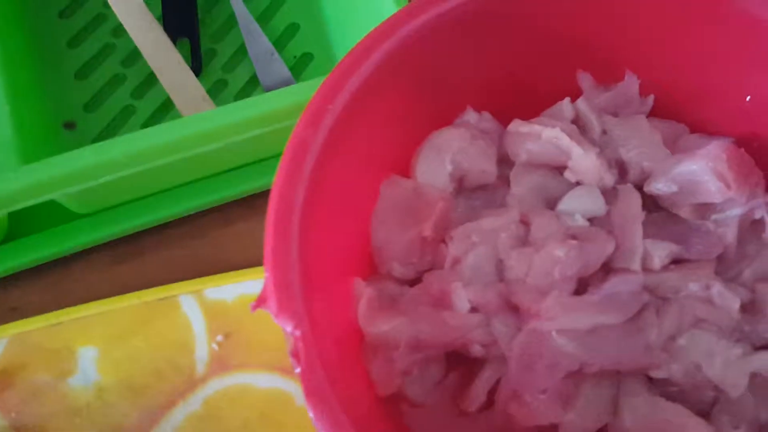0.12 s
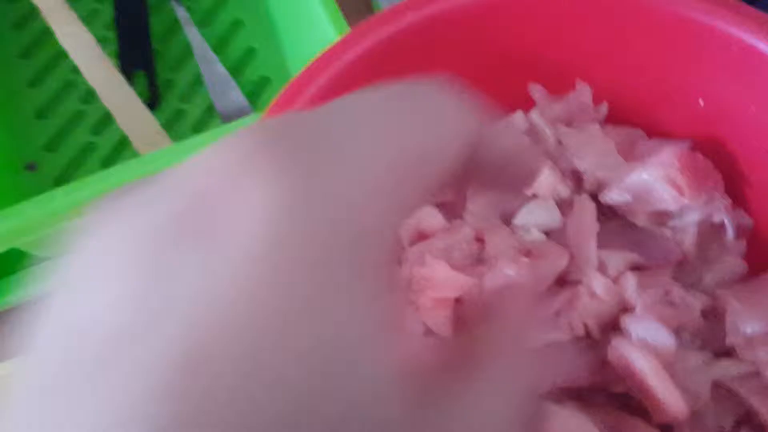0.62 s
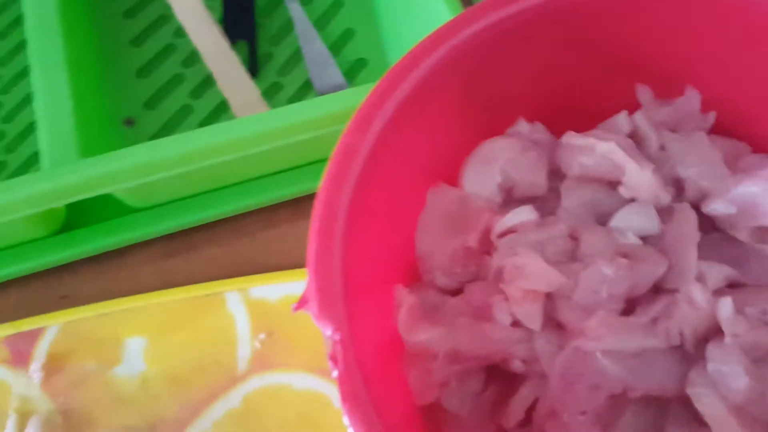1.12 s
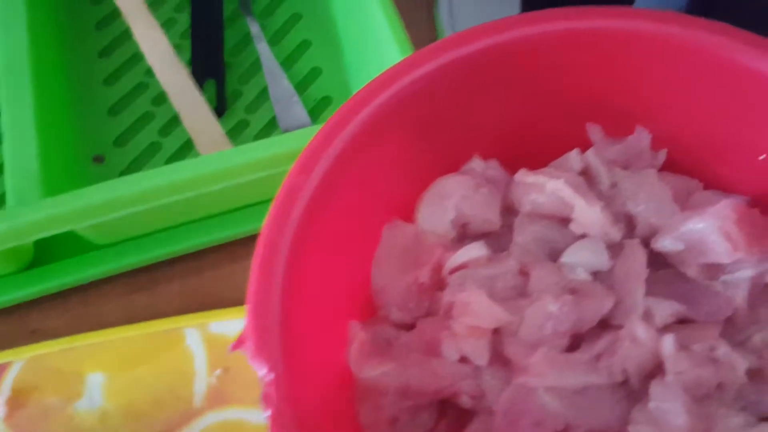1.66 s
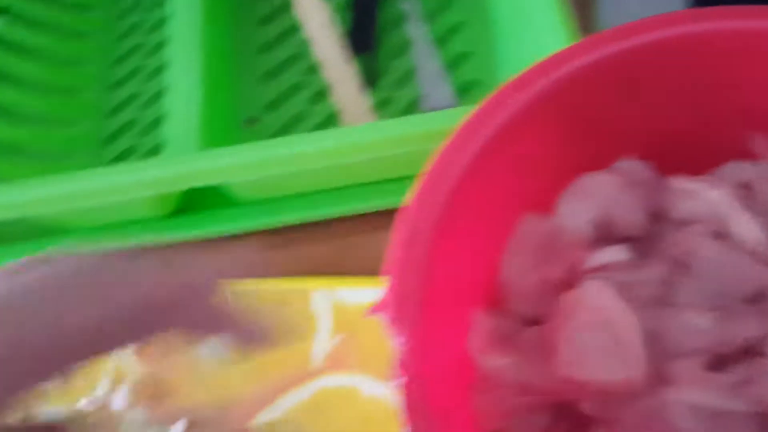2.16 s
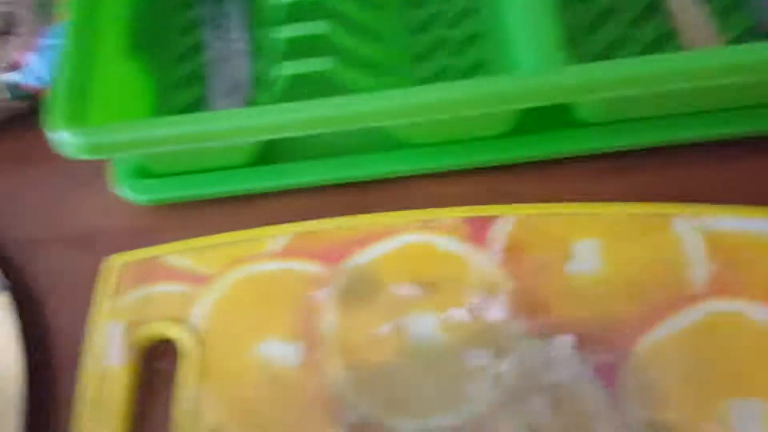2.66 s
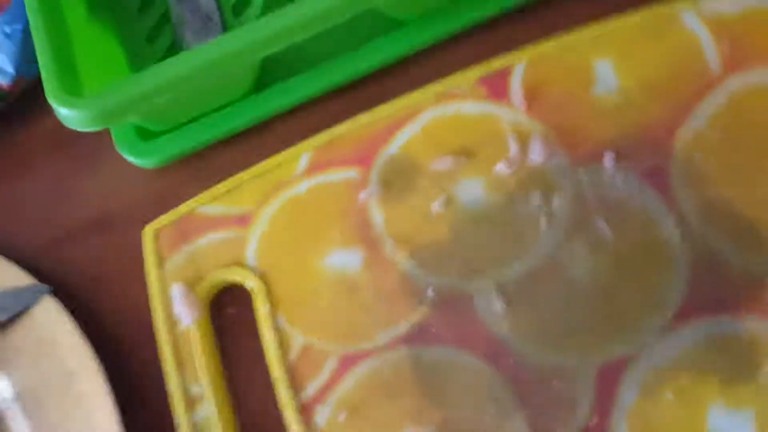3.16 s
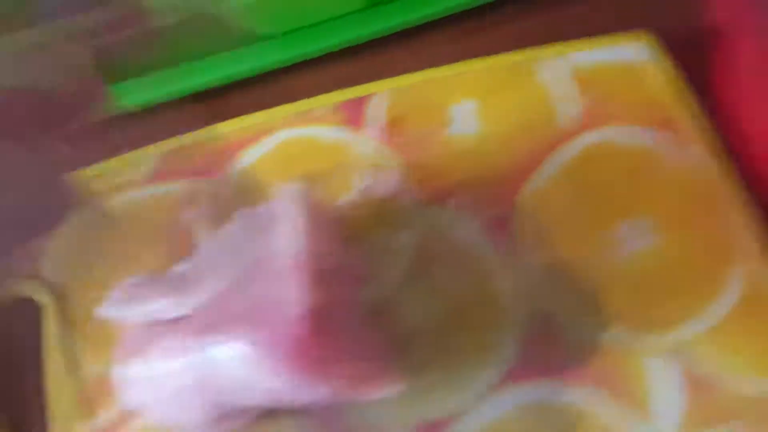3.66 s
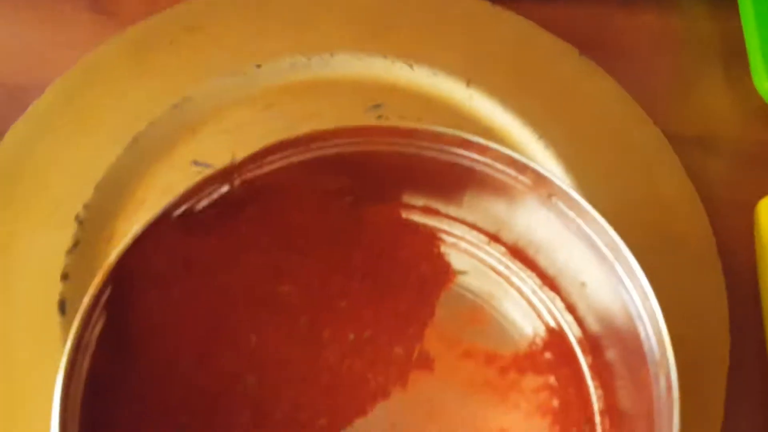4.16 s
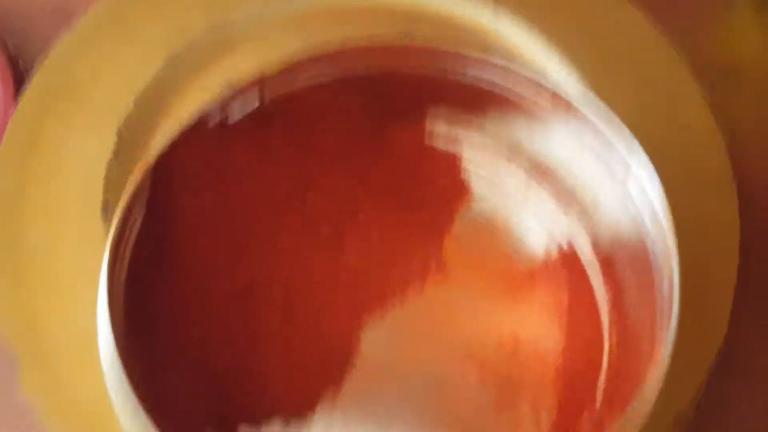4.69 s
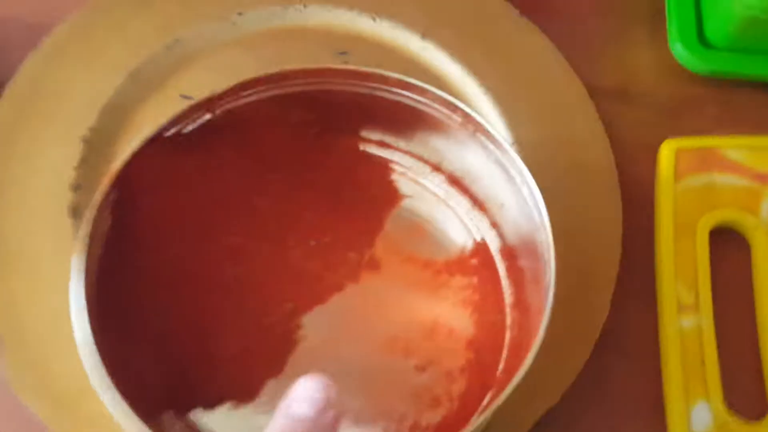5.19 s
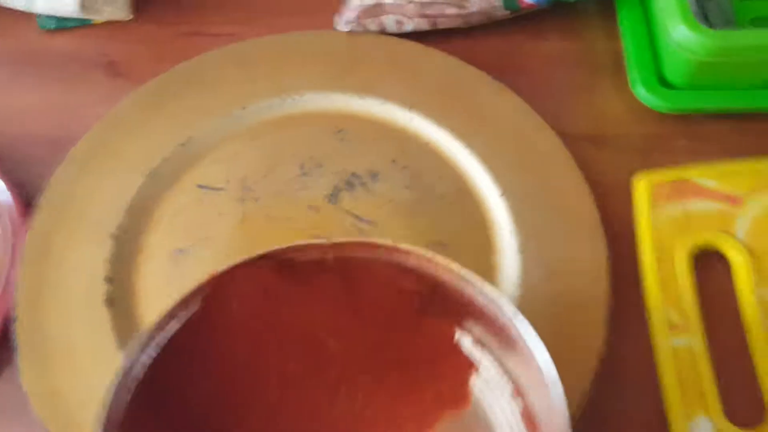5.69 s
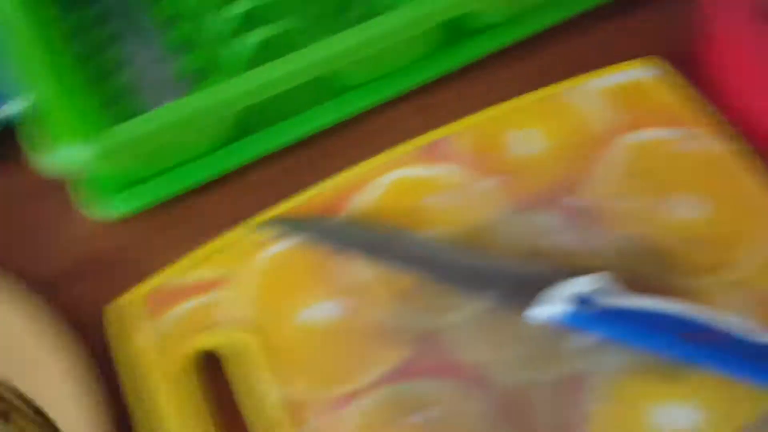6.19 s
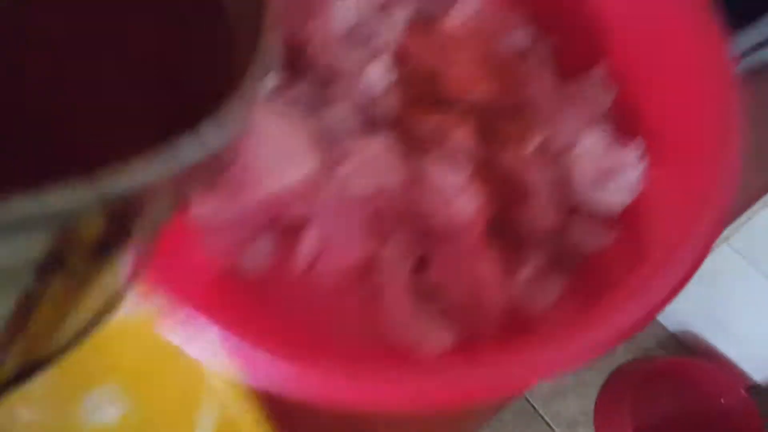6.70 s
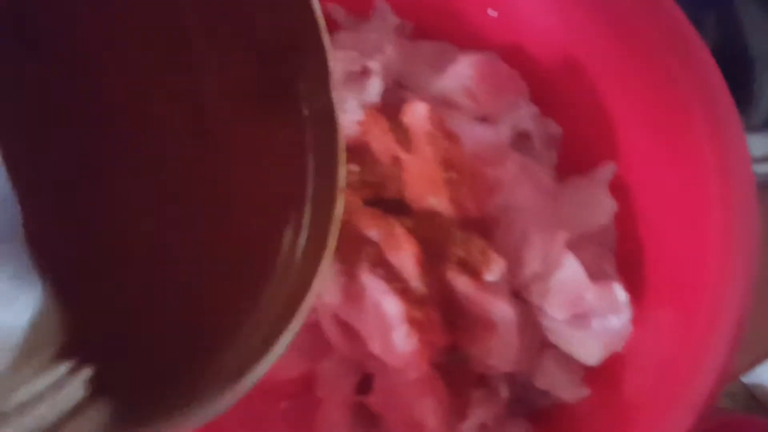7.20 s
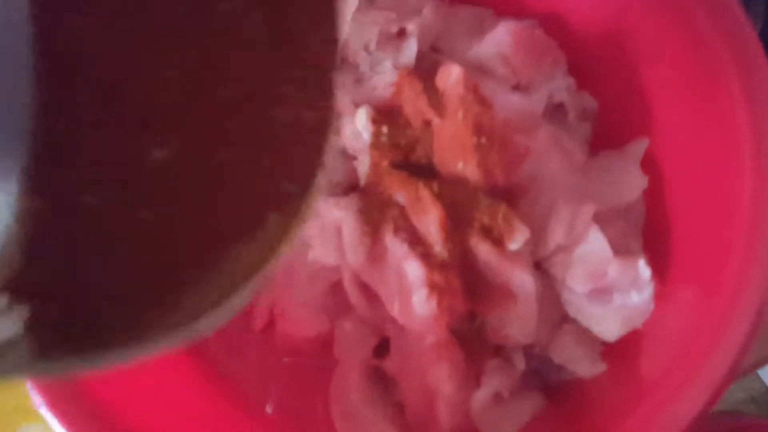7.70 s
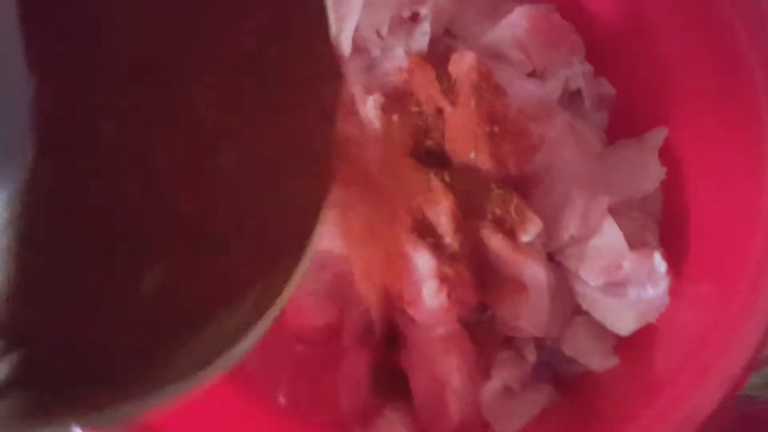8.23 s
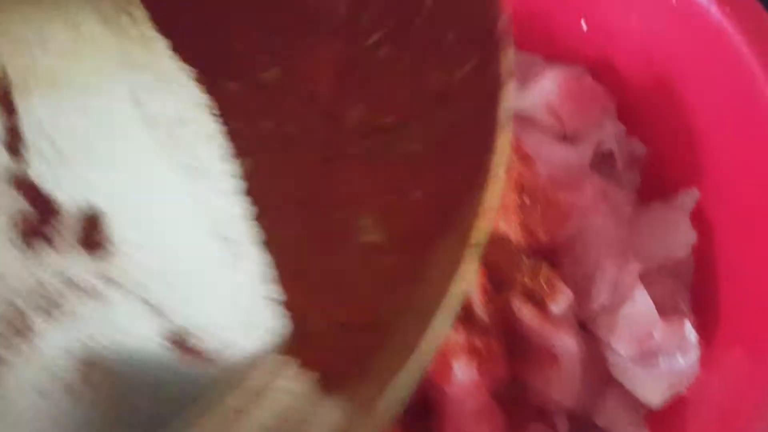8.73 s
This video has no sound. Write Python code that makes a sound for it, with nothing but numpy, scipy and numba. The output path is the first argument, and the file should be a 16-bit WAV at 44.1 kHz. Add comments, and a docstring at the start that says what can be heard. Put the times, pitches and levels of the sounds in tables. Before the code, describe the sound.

A handheld, close stereo microphone in a reverberant kitchen picks up faint appliance hum and quiet knocks, clicks and rubbing on a counter. Near five seconds a large dog gives one loud, gruff bark with strong reflections. Sharper dish clatter follows, then two more quick barks, and finally faint dry puffs of powder shaken from a tin. The sound dips after barks and eases back.

```python
"""A hard-walled kitchen from a handheld camera with two close microphones, faint appliance hum all through.
First a hand close by knocks, clicks and rubs dishes on the counter: short pushes ring modes, noise is shaped.
Near 4.9 s a large dog some way off barks: rough pulses through a moving throat, with strong room reflections.
Dishes and sliding powder follow, two more barks just after 7 s, then puffs of powder shaken from a tin.
Gain control ducks the whole sound after each bark and lets it ease back."""
import sys
import numpy as np
from scipy import signal
from scipy.io import wavfile
from scipy.ndimage import uniform_filter1d
from numba import njit

SR = 44100
rng = np.random.default_rng(int(sys.argv[2]) if len(sys.argv) > 2 else 0)


def bounce(signal):
    """Save signal as a 16-bit WAV file at the path given by the first command-line argument."""
    frames = np.transpose(np.atleast_2d(signal))
    limited = np.clip(frames, -1, 1)
    pcm = np.round(limited * 32767).astype(np.int16)
    wavfile.write(sys.argv[1], SR, pcm)


def decibels_to_gain(level_db):
    """Convert a level in decibels to a linear amplitude gain (20 dB per decade)."""
    exponent = np.asarray(level_db, float) / 20
    return 10 ** exponent


N = 390285

# the dog's barks: (burst time [s], effort [dB], pitch before the sag [Hz], pitch where the growl starts [Hz],
# widest mouth [factor on the throat])
BARKS = [(4.853, -12, 174.6, 170.1, 1.04), (7.108, -12, 170.8, 70.23, 1.09),
         (7.445, -12.5, 163.8, 111.8, 1.15)]
# resonances of throat and mouth at factor 1: (centre [Hz], width [Hz], level [dB])
THROAT = [(405.5, 130.5, 4), (680, 180, -9.5), (1000, 295, -2), (1557, 730, -13.5), (2310, 740, -23.5)]
# hiss of air past tongue and teeth: (centre [Hz], width [Hz], level with the mouth open [dB])
RASP = [(5650, 3700, -34), (8870, 7200, -42.5)]
# blows on counter and dishes: (time [s], ring peak [dB], favoured ring [Hz], boom before its soft start [dB],
# drag [s])
KNOCKS = [(0.136, -51, 664, -38, 0.0075), (1.106, -45, 338, -52, 0.03), (1.24, -32, 710, -34, 0.0087),
          (1.327, -38, 361, -35, 0.0043), (1.401, -41, 352, -38, 0.0029), (1.517, -48, 234, -31.5, 0.0039),
          (2.079, -44.5, 296, -70, 0.0062), (2.783, -35.5, 230, -29.5, 0.0058),
          (2.978, -28.5, 690, -35, 0.0013), (3.549, -25, 1010, -31, 0.0013),
          (4.081, -35, 360, -30, 0.00067), (5.384, -15, 940, -50, 0.0067), (5.463, -36.5, 948, -55, 0.0034),
          (5.557, -31.5, 955, -66, 0.03), (5.633, -16.5, 300, -44, .007), (5.669, -22.5, 350, -54, 0.0032),
          (5.713, -31, 350, -39, 0.021), (5.757, -29.5, 342, -49, .008), (6.317, -36, 680, -45.5, 0.0026),
          (6.526, -39.5, 338, -66, 0.008)]
# ringing modes of the counter: (frequency [Hz], level before favouring [dB], t60 [s])
COUNTER_MODES = [(199.5, -11.5, 0.33), (271, -14, 0.043), (350, -5.5, 0.056), (435, -4.5, 0.0295),
                 (670, -25.5, 0.062), (736, -4.5, 0.033), (894, -12.5, 0.02), (1035, 2, 0.009),
                 (1265, -12.5, 0.033)]
# small sharp clicks: (time [s], crackle onset [dB], crackle centre [Hz], snap onset [dB])
CLICKS = [(0.139, -44.5, 4100, -53), (0.687, -41, 4600, -44), (1.4044, -37.5, 9300, -43.5),
          (2.9154, -33, 9770, -39.5), (2.9932, -35.5, 8700, -60), (3.5424, -30, 3730, -81),
          (4.0842, -35.5, 8500, -37.5), (5.3865, -47, 3840, -11), (5.4637, -51, 2970, -19.5),
          (5.7765, -30, 3030, -19), (5.7885, -42.5, 3086, -29.5), (5.8077, -28.5, 7200, -31.5),
          (5.8333, -27.5, 7880, -65.5)]
# hand and dishes sliding: (peak time [s], rise [s], fall [s], peak level [dB], centre [Hz])
STROKES = [(2.275, 0.19, 0.46, -56, 2960), (2.781, 0.087, 0.12, -61, 4640), (3.23, 0.22, 0.14, -43, 3330),
           (3.536, 0.026, 0.03, -57.5, 3600), (4.75, 0.038, .03, -43, 3070),
           (5.758, 0.24, 0.027, -38, 1160), (2.1, 0.22, 0.14, -56, 474), (4.3, .2, 0.18, -54, 350),
           (1.3, 0.15, 0.37, -56.5, 446), (5.841, 0.18, 0.055, -48.5, 6000), (6.528, 0.05, 0.11, -55, 3510),
           (6.849, 0.11, 0.32, -53.5, 3480)]
# dry powder sliding as the tin is lifted, then shaken from it: (time [s], level before the fades [dB], length [s])
POWDER_PUFFS = [(5.34, -53, .1), (5.53, -58, .1), (5.67, -59.5, .12), (5.8, -50, .12), (7.89, -60.5, .06),
                (7.985, -44.5, .055), (8.065, -46, .06), (8.17, -67.5, .05), (8.24, -56, .06),
                (8.325, -54.5, .055), (8.4, -55.5, .06)]
# bumps of the handheld camera: (time [s], level before the soft start [dB], frequency [Hz])
JOLTS = [(3.55, -25.5, 43), (4.08, -31.5, 81), (4.6, -20, 48)]
# low shaking of the handheld camera: (time [s], level before the channel weights [dB])
RUMBLE = [(0, -56), (4.2, -77), (4.499, -61.5), (8.85, -80)]
# strongest standing waves of the room: (frequency [Hz], width [Hz], boost [dB])
STANDING_WAVES = [(347, 12, 8), (420, 12, 4), (482, 12, 7), (566, 12, 1), (660, 18, 5), (732, 14, 1),
                  (843, 12, 2), (897, 12, 5), (953, 12, 1), (1040, 10, 7), (1193, 12, 3), (1260, 12, -1),
                  (1548, 24, 1), (1775, 24, -1)]
# decay of the reflections: (frequency [Hz], t60 [s])
WALL_DECAY = [(200, 0.22), (500, 0.64), (1000, 0.52), (2500, 0.59), (8000, 0.34)]
# likeness of the left and right microphones: (frequency [Hz], correlation [-1 to 1])
LIKENESS = [(60, 1), (180, 0.85), (550, 0.63), (1650, -0.23), (4970, 0.11), (15000, -0.16)]
# relative spectrum of the broad room noise: (frequency [Hz], density [dB per Hz])
HUM_SPECTRUM = [(35, -42.5), (60, -24), (268, -5), (389, -10.5), (698, -9.5), (1580, -9.5), (2050, -7),
                (3340, -21), (4220, -22), (5330, -25.5), (12100, -24.5), (16000, -31.5)]
# fuzzy bands of the appliance: (centre [Hz], width [Hz], nominal level [dB])
DRONE = [(110, 41, -60.5), (265, 10, -70), (1980, 310, -58), (4410, 580, -73)]

GROWL_S, LEAP_S, BARK_S, RELEASE_S = .05, 0.033, .19, 0.032  # the leap from growl to voice centres on the burst
GROWL_DB, SWELL_DB_PER_S, FADE_DB_PER_S = -23, 497.5, 45
CHEST_DB = 3  # the growl's lowest tone booms in the chest
ROUGH_GROWL, ROUGH_START, ROUGH_END = .1, .35, .5
SAG, TOP_AT = .06, 0.371  # share of pitch lost at the widest mouth; where in the bark that comes, as a share
MOUTH_SHUT, MOUTH_EDGE = 0.44, .9  # factor on the throat in the growl and at both ends of the bark
BOOM_HZ = 111  # the counter's lowest ring
STROKE_ENDS_DB = -15.5  # level at both ends of a stroke, below its peak
HUM_DB = -55.5  # broad room noise before its patches
HISS_DB = -73.5  # the recorder's own noise


def evened(x):
    """Scales to rms 1."""
    return x / np.sqrt(np.mean(x ** 2) + 1e-20)


def read(points, hz):
    """Reads a (frequency [Hz], value) table on a log axis."""
    f, value = np.transpose(points)
    return np.interp(np.log(hz + 1), np.log(f + 1), value)


def add(mix, s, sound):
    """Mixes a sound in from time s."""
    part = mix[..., round(s * SR):][..., :sound.shape[-1]]
    part += sound[..., :part.shape[-1]]


def resonate(x, hz, width):
    """Shifts the curve hz down to zero, smooths twice, and shifts back: a steep resonance."""
    turn = np.exp(2j * np.pi * np.cumsum(hz * np.ones(x.shape[-1])) / SR)
    r = np.exp(-np.pi * width / SR)
    smooth = signal.lfilter([(1 - r) ** 2], [1, -2 * r, r * r], x / turn + 1e-18)
    return 2 * (turn * smooth).real


def paired(z):
    """Makes two spectra (channel, Hz, frame) alike in the bass, as two close microphones hear a room."""
    same = np.clip(read(LIKENESS, np.linspace(0, SR / 2, z.shape[1])), -1, 1)[:, None]
    return np.array([z[0], same * z[0] + np.sqrt(1 - same ** 2) * z[1]])


def bark(burst, effort_db, pitch_hz, growl_hz, widest):
    """Uneven fold pulses and puffs of air pass a throat that opens and shuts."""
    t = np.arange(-GROWL_S, BARK_S + RELEASE_S, 1 / SR)
    leap = np.clip(t / LEAP_S + .5, 0, 1)
    done = np.clip(t / BARK_S, 0, 1)
    arch = np.sin(np.pi * done ** (np.log(.5) / np.log(TOP_AT))) ** 1.5

    scoop = np.clip((t + GROWL_S) / (GROWL_S + LEAP_S / 2), 0, 1)
    hz = growl_hz + scoop * (pitch_hz - growl_hz) - SAG * arch * pitch_hz
    mouth = MOUTH_SHUT + leap * (MOUTH_EDGE - MOUTH_SHUT) + arch * (widest - MOUTH_EDGE)
    rough = ROUGH_GROWL + leap * (ROUGH_START - ROUGH_GROWL) + done * (ROUGH_END - ROUGH_START)
    growl_db = GROWL_DB * (1 - leap) + SWELL_DB_PER_S * np.minimum(t + LEAP_S / 2, 0)
    fade_db = FADE_DB_PER_S * np.maximum(t, 0) + 40 * np.maximum(t - BARK_S, 0) / RELEASE_S
    level_db = effort_db + growl_db - fade_db

    wobble, flutter, air = rng.standard_normal((3, SR // 2))[:, :len(t)]
    turns = np.cumsum(hz * (1 + .15 * rough * evened(uniform_filter1d(wobble, 300)))) / SR
    folds = sum(np.cos(2 * np.pi * k * turns) for k in range(1, 26))
    folds = folds * decibels_to_gain(9 * rough * evened(uniform_filter1d(flutter, 260)))
    puffs = (.3 + np.exp(-(turns % 1) / .3)) * air  # air escapes most at the start of each cycle
    drive = evened(folds) + 1.2 * rough * evened(puffs)
    drive = drive - leap * resonate(drive, hz, 120)  # the full voice has a weak fundamental

    shut_db = 40 * np.minimum(mouth - .85, 0)  # a closed mouth muffles and lowers the upper resonances
    (f, width, db), *upper = THROAT
    throat = decibels_to_gain(db) * resonate(drive, f * mouth, width)
    throat = throat + (1 - leap) * decibels_to_gain(CHEST_DB) * resonate(drive, hz, 99)
    for k, (f, width, db) in enumerate(upper):
        formant = resonate(drive, f * np.minimum(mouth + 0.062, 1), width)
        throat = throat - (-1) ** k * decibels_to_gain(db + shut_db) * formant
    for f, width, db in RASP:
        throat = throat + decibels_to_gain(db + shut_db) * resonate(evened(puffs), f, width)
    # the running level is evened out so that level_db alone shapes the bark
    level = np.sqrt(uniform_filter1d(throat ** 2, 1500) + 1e-12)
    return burst - GROWL_S, decibels_to_gain(level_db) * throat / level


def knock(db, ring_hz, boom_db, drag_s):
    """An uneven push, dragged out for drag_s, rings the modes near ring_hz over a dull puff and a boom."""
    t = np.arange(10000) / SR
    push, air = rng.standard_normal((2, 2, len(t)))
    push = (push + push[0]) * np.sqrt(t) * np.exp(-t / max(drag_s, .001))
    ring = 0
    for f, mode_db, t60 in COUNTER_MODES:
        favoured_db = mode_db - 2.2 * abs(np.log2(f / ring_hz))
        ring = ring + decibels_to_gain(favoured_db - 60 * t / t60) * np.sin(2 * np.pi * f * t)
    ring = signal.oaconvolve(ring[None], push, axes=1)[:, :len(t)]
    puff_level = signal.oaconvolve(decibels_to_gain(-60 * t / .15), abs(push[0]))[:len(t)]
    puff = resonate(air, 0, 2000) * puff_level
    blow = ring / abs(ring).max() + 0.66 * puff / abs(puff).max()
    return decibels_to_gain(db) * blow + thump(boom_db, BOOM_HZ, 0.09 + 30 * drag_s)


def click(db, hz, snap_db):
    """A millisecond of bright crackle, heard differently left and right, and a duller grainy snap."""
    t = np.arange(600) / SR
    high, low = rng.standard_normal((2, 2, len(t)))
    crackle = evened(resonate(high, hz, 3500)) * np.exp(-t / 0.0013)
    snap = evened(resonate(low + low[0], 1400, 1900)) * np.exp(-t / .0012)
    return decibels_to_gain(db) * crackle + decibels_to_gain(snap_db) * snap


def stroke(peak, rise, fall, db, hz):
    """Rubbing: grainy noise in one broad band, swelling to a peak and fading."""
    t = np.arange(-rise, fall, 1 / SR)
    noise, grain = rng.standard_normal((2, 2, SR))[..., :len(t)]
    grains = noise * decibels_to_gain(3 * evened(uniform_filter1d(grain[0], 200)))
    width = 2.6 * hz * min((rise + fall) / .3, 1)  # a quick flick is narrower
    band = evened(resonate(grains, hz, width))
    level_db = db + STROKE_ENDS_DB * np.maximum(-t / rise, t / fall)
    return peak - rise, decibels_to_gain(level_db) * band * signal.windows.tukey(len(t), .15)


def powder_puff(db, length_s):
    """A soft bright puff of grains against the tin wall: noise in a broad and a narrow band."""
    grains = rng.standard_normal((2, round(length_s * SR)))
    puff = resonate(grains, 7300, 16000) + 2.3 * resonate(grains, 8900, 1100)
    return decibels_to_gain(db) * evened(puff) * signal.windows.tukey(grains.shape[1], .6)


def thump(db, hz, t60):
    """A low dying sine with a soft start, a little stronger on the right."""
    t = np.arange(10000) / SR
    tone = decibels_to_gain(db - 60 * t / t60) * np.sin(2 * np.pi * hz * t) * (1 - np.exp(-t / 0.03))
    return np.array([[.8], [1.2]]) * tone


def room(x):
    """Dense reflections that build up and die band by band, beside the ringing standing waves."""
    hz, frames, z = signal.stft(rng.standard_normal((2, SR)), SR, nperseg=256)
    decay = decibels_to_gain(-60 * frames / read(WALL_DECAY, hz)[:, None])
    tail = signal.istft(paired(z) * decay, SR, nperseg=256)[1][:, :SR]
    t = np.arange(SR) / SR
    tail = tail / np.linalg.norm(tail[0])
    angles = rng.uniform(-np.pi, np.pi, (len(STANDING_WAVES), 2))
    for (f, width, db), (phase, apart) in zip(STANDING_WAVES, angles):
        right_shift = apart * (1 - np.clip(read(LIKENESS, f), 0, 1))
        turn = 2 * np.pi * f * t + phase + np.array([[0], [right_shift]])
        dying = 2 * np.pi * width / SR * np.exp(-np.pi * width * t)
        tail = tail + decibels_to_gain(db) * dying * np.sin(turn)
    build_up = 1 - np.exp(-t / 0.0036)
    return signal.oaconvolve(x[None], tail * build_up, axes=1)[:, :N]


def rumble():
    """Lumpy sub-bass noise, stronger and partly separate at the right microphone."""
    s, level_db = np.transpose(RUMBLE)
    band = signal.butter(2, [30, 56], "bandpass", fs=SR, output="sos")
    a, b = evened(signal.sosfilt(band, rng.standard_normal((2, N))))
    return decibels_to_gain(np.interp(np.arange(N) / SR, s, level_db)) * np.array([.6 * a, a + .7 * b])


def hum():
    """Broad room noise and the appliance's fuzzy bands: shaped noise with drifting patches."""
    noise = rng.standard_normal((2, N))
    hz, t, z = signal.stft(noise, SR, nperseg=2048, noverlap=1536)
    patches = uniform_filter1d(rng.standard_normal(z.shape[1:]), 16, 0)
    patches = evened(uniform_filter1d(patches, 12, 1))
    bands = sum(decibels_to_gain(2 * db) / width / (1 + ((hz - f) / width * 2) ** 4) for f, width, db in DRONE)
    broad = decibels_to_gain(2 * read(HUM_SPECTRUM, hz))
    broad *= decibels_to_gain(2 * HUM_DB) / (broad.mean() * SR / 2)
    z = paired(z) * np.sqrt((broad + bands) * SR / 2)[:, None] * decibels_to_gain(1.2 * patches)
    return signal.istft(z, nperseg=2048, noverlap=1536)[1][:, :N]


def scene():
    """Dog far in the room, hands near the microphones, hum all round."""
    dog, blows, near = np.zeros(N), np.zeros((2, N)), np.zeros((2, N))
    for row in BARKS:
        add(dog, *bark(*row))
    for s, *row in KNOCKS:
        add(blows, s, knock(*row))
    for s, *row in CLICKS:
        add(near, s, click(*row))
    for row in STROKES:
        add(near, *stroke(*row))
    for s, *row in POWDER_PUFFS:
        add(near, s, powder_puff(*row))
    no_bass = signal.butter(2, 130, "highpass", fs=SR, output="sos")
    dog = signal.sosfilt(no_bass, dog)  # the barks carry no deep bass
    wet = room(decibels_to_gain(14.5) * dog + decibels_to_gain(-4.0) * blows[0] + decibels_to_gain(-4.0) * near[0])
    for s, db, hz in JOLTS:  # added after the room, so they stay dry
        add(near, s, thump(db, hz, 0.17))
    direct = np.array([dog, np.roll(dog, shift=14)])  # the dog stands to one side: the right hears it later
    return direct + blows + near + wet + hum() + rumble()


@njit
def follow(want_db, fall, recover, hold):
    """Gain sinks towards the wanted cut, waits the longer the longer it was sinking, then eases back."""
    out, now, wait = np.empty_like(want_db), 0.0, 0.0
    for k in range(len(want_db)):
        if want_db[k] > now:
            now, wait = now + fall * (want_db[k] - now), wait + hold
        elif wait > 0:
            wait -= 1
        else:
            now += recover * (want_db[k] - now)
        out[k] = now
    return out


def roll_off(x):
    """The treble ends steeply here."""
    return signal.sosfilt(signal.butter(12, 16540, fs=SR, output="sos"), x)


def record(dry):
    """Gain control ducks after loud sound and recovers slowly; peaks round off at full scale."""
    power_db = 10 * np.log10(abs(uniform_filter1d((dry ** 2).mean(0), 800)) + 1e-12)
    want_db = np.clip(0.79 * (power_db + 21), 0, 14)
    cut_db = follow(want_db, fall=1 / (0.035 * SR), recover=1 / (.28 * SR), hold=1.67)
    ducked = dry / decibels_to_gain(cut_db)
    hissing = ducked + decibels_to_gain(HISS_DB) * rng.standard_normal(dry.shape)
    rounded = hissing / (1 + abs(hissing) ** 4) ** .25
    return roll_off(rounded)


dry = scene()
out = record(dry)
bounce(out)
```